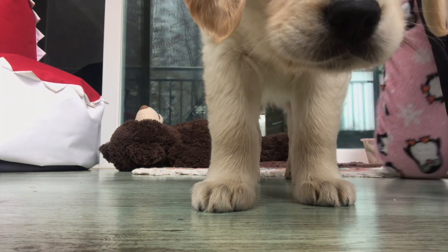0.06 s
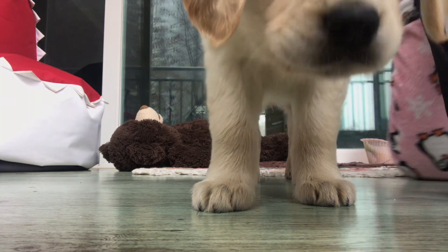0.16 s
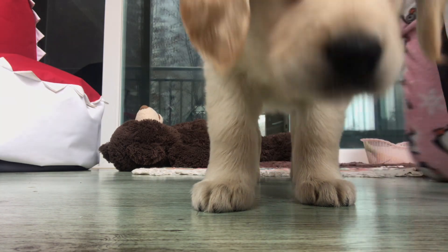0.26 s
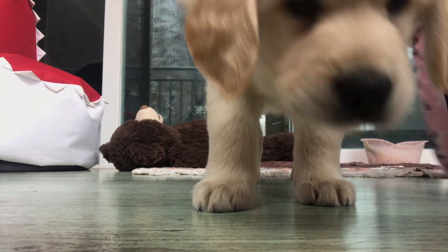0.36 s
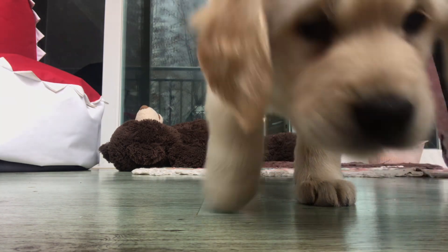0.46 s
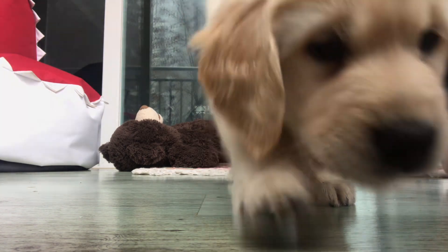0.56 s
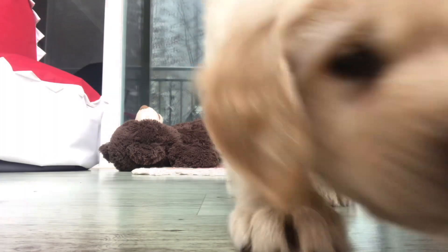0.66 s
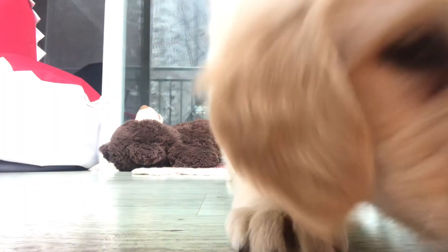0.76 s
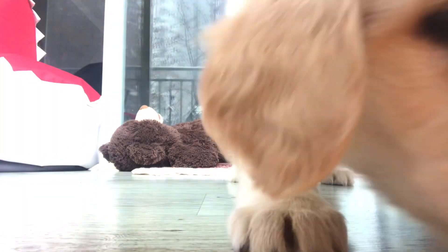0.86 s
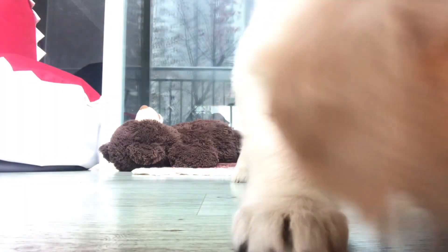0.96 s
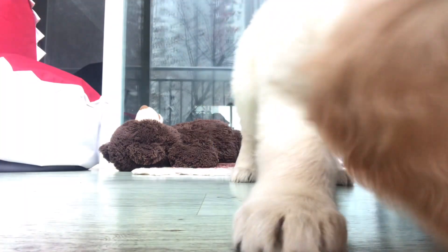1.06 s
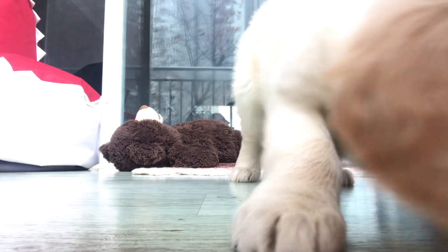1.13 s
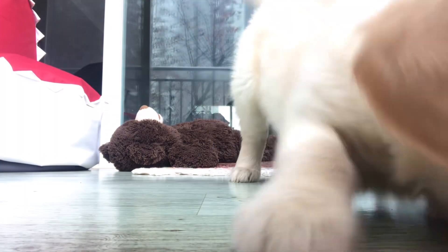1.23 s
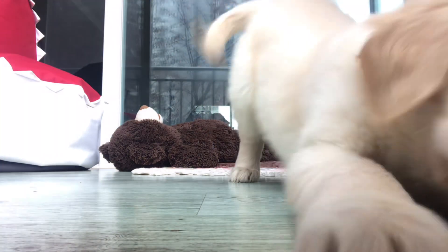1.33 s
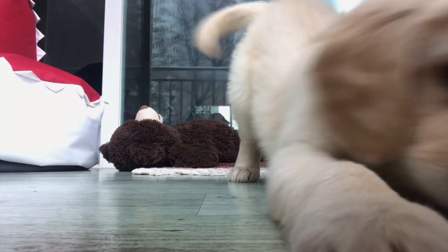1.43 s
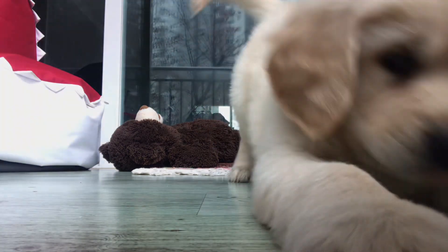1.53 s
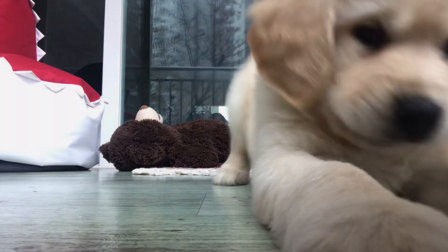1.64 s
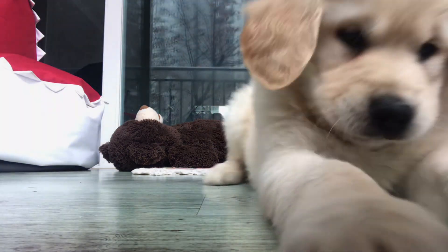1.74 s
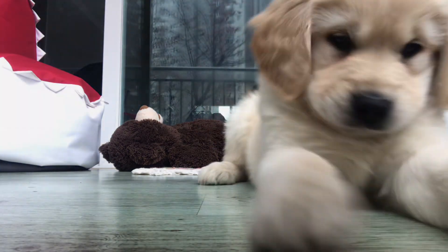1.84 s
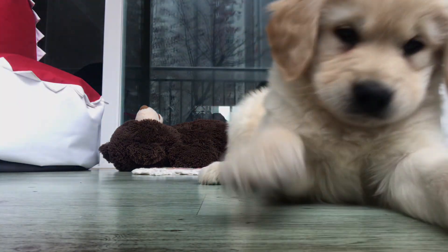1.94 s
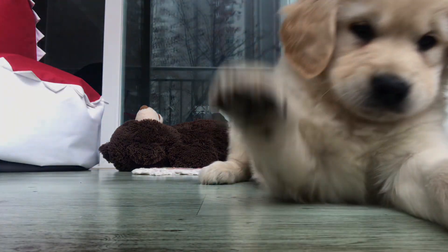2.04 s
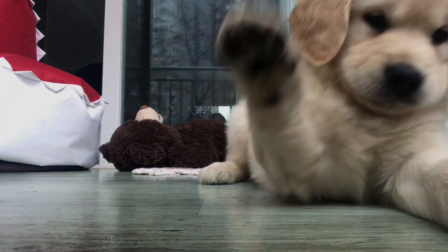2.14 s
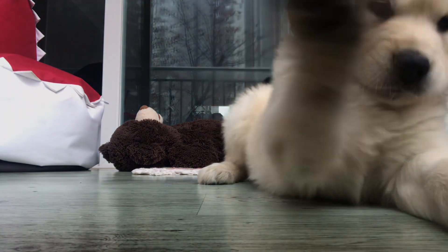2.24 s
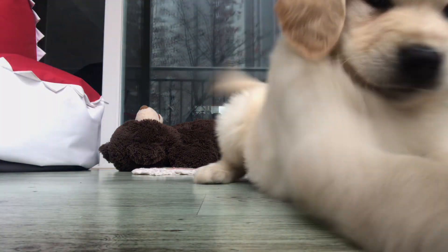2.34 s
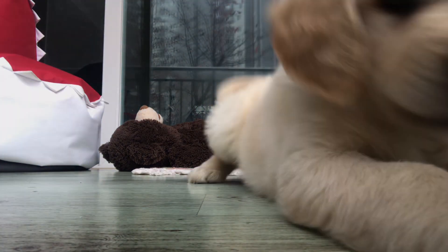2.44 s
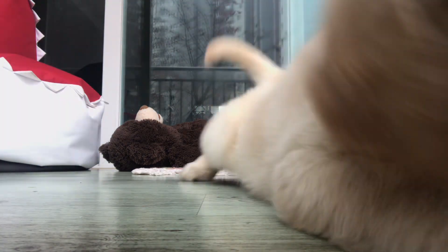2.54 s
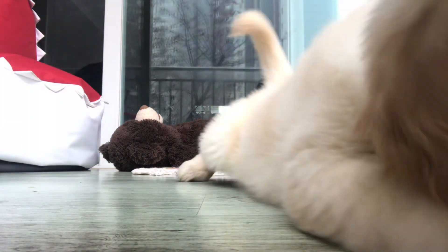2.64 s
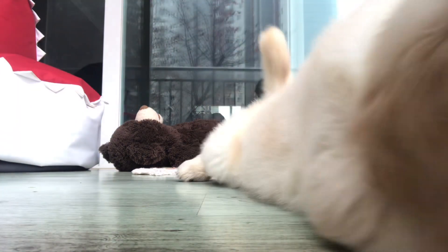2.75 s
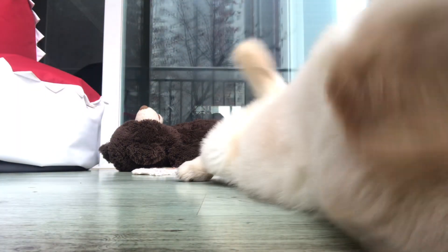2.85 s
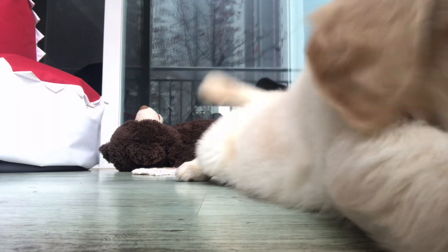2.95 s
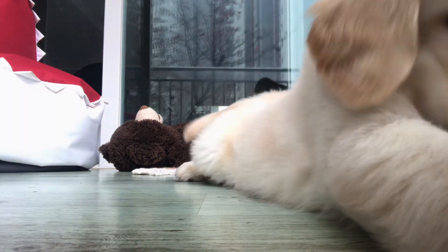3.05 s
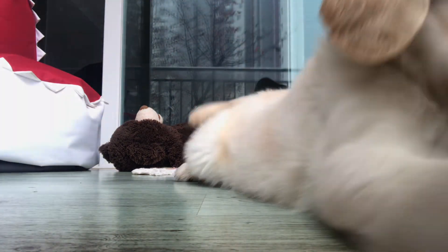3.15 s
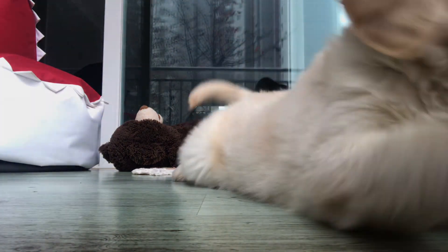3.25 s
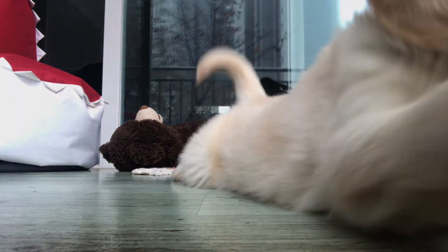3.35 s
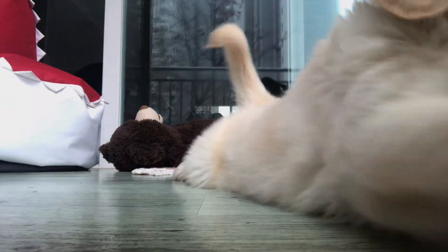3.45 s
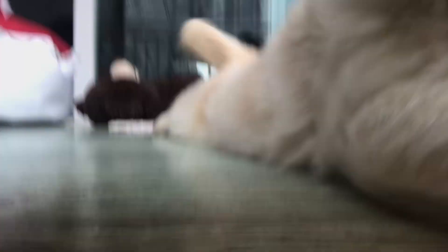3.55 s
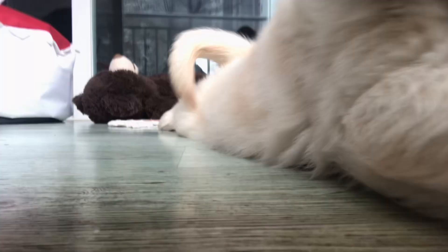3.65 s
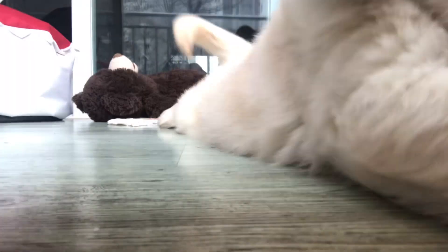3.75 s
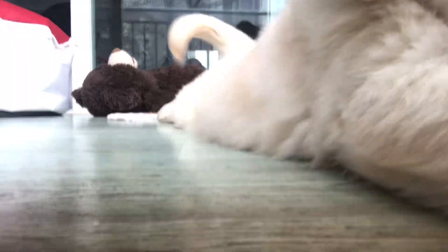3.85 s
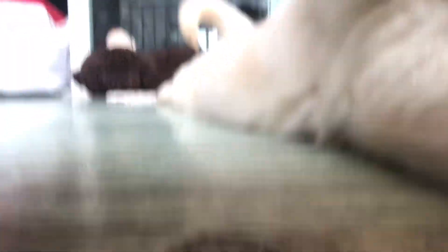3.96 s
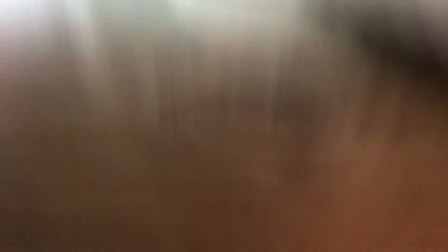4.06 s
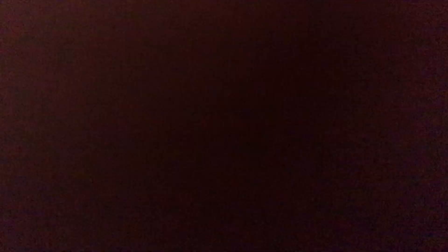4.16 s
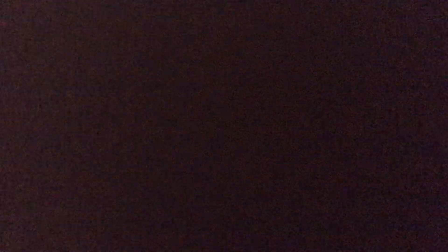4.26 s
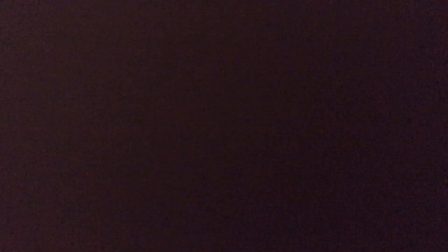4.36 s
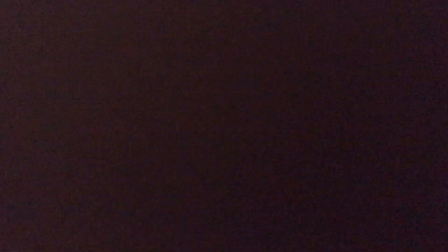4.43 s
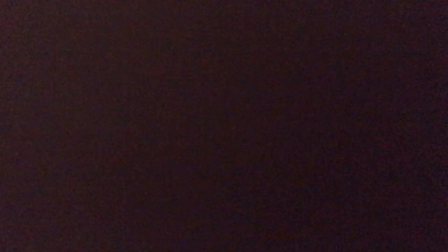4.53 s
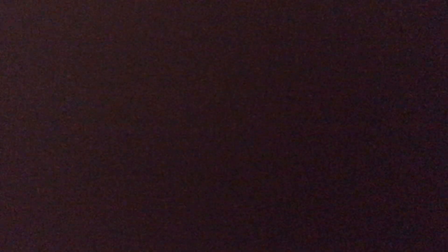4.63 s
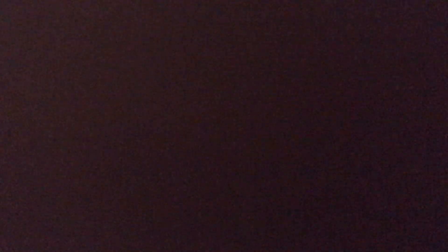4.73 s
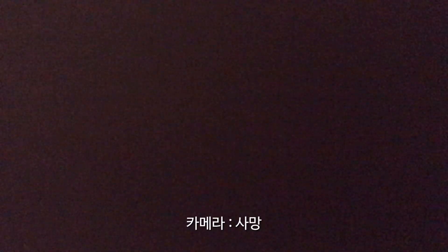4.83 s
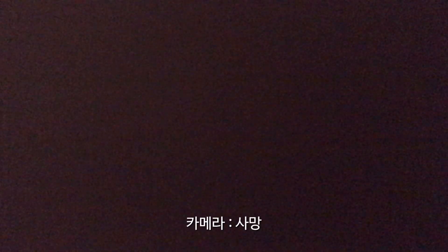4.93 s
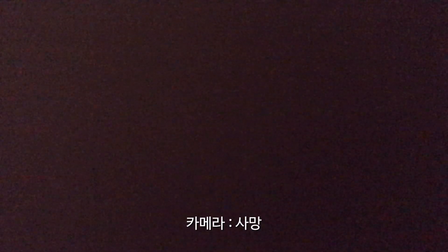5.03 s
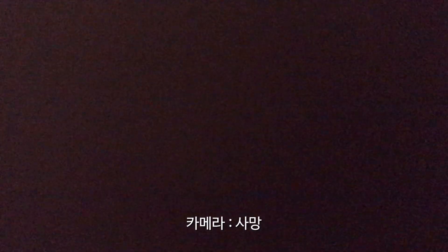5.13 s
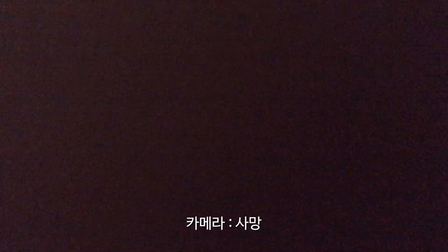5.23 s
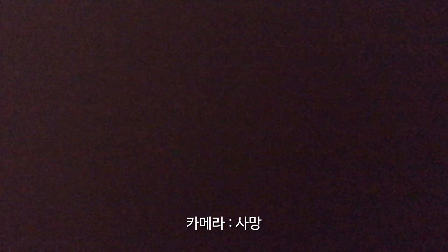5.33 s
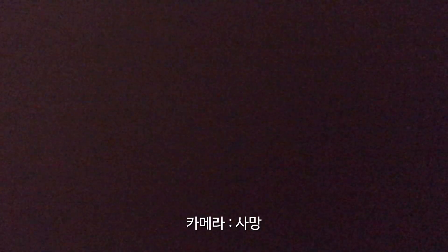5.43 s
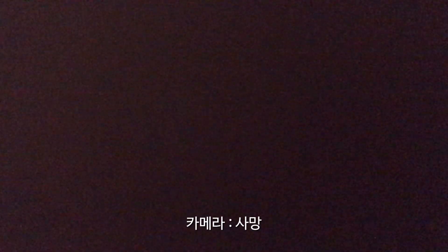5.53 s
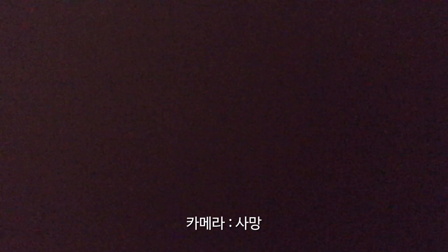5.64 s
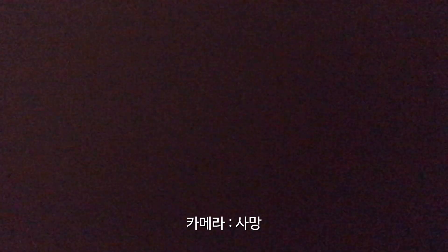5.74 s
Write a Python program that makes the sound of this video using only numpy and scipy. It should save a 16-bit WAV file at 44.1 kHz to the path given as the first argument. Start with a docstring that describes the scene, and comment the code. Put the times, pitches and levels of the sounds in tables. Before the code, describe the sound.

Soft claw ticks, snorts and fur rustle close by, then sharp plastic clacks as a phone topples, followed by dull scraping and thumps.

```python
"""Puppy topples a phone

A puppy sniffs at a phone that stands on a wooden floor, lies down and paws it until it topples.
Claws, fur and scuffs are shaped noise and sparse grains; the case clacks with cracks and decaying
modes, and thumps with sinking sines. Then the phone lies on its face: the room is dimmed, shoves
rub as a dull rush with gritty hiss, and a floorboard note joins in.
"""
import sys
import numpy as np
from scipy import signal
from scipy.fft import rfft, irfft
from scipy.io import wavfile
from scipy.ndimage import uniform_filter1d

SR = 44100
rng = np.random.default_rng(int(sys.argv[2]) if len(sys.argv) > 2 else 0)


def file_out(sig):
    """Save sig as 16-bit WAV at sys.argv[1]."""
    # one column per channel
    cols = np.atleast_2d(sig).T
    # limit, then scale
    lim = np.clip(cols, -1, 1)
    pcm = np.round(lim * 32767).astype(np.int16)
    wavfile.write(sys.argv[1], SR, pcm)


N = 255339
TIME = np.arange(N) / SR
FALL_S = 4.2  # from here the microphone is covered and the case is pressed to the floor
FLAT_S = 4.38  # from here the phone lies flat


def amp(db):
    """Decibels to gain."""
    return 10 ** (np.asarray(db) / 20)


def unit(x):
    """Scale to an energy of one."""
    return x / np.sqrt(np.sum(x ** 2))


def colour(x, points):
    """Filter x through a curve of (frequency [Hz], gain [dB]) points, then bring it to rms one."""
    hz, db = np.transpose(points)
    f = np.maximum(np.arange(N // 2 + 1) * SR / N, 1)
    curve = amp(np.interp(np.log(f), np.log(hz), db))
    y = irfft(rfft(x) * curve, N)
    return y / y.std()


def resonate(x, hz, q):
    """Two-pole band-pass."""
    w = 2 * np.pi * min(hz, SR / 3) / SR
    a = np.sin(w) / (2 * q)
    return signal.lfilter([a, 0, -a], [1 + a, -2 * np.cos(w), 1 - a], x)


def low_cut(x, hz):
    """Second-order high-pass."""
    return signal.sosfilt(signal.butter(2, hz, "high", fs=SR, output="sos"), x)


def fade(t, t60):
    """Exponential decay that falls by 60 dB in t60 seconds."""
    return np.exp(-np.log(1000) * t / t60)


def hann(seconds):
    """A smooth bump with a sum of one."""
    w = np.hanning(int(seconds * SR) + 3)
    return w / w.sum()


def stroke(start, end, edge):
    """A gate with rounded edges that take `edge` seconds to open and close."""
    gate = (TIME > start) * (TIME < end) * 1.
    return np.clip(signal.fftconvolve(gate, hann(edge), "same"), 0, 1)


def walk(rate):
    """A smooth random wander at rms one, with `rate` new values a second."""
    k = max(int(SR / rate), 1)
    steps = np.repeat(rng.standard_normal(N // k + 1), k)[:N]
    y = uniform_filter1d(steps, k)
    return y / y.std()


def friction(grain_db, grain_rate):
    """Countless tiny catches as noise whose strength wanders from moment to moment, at rms one."""
    y = rng.standard_normal(N) * amp(grain_db * walk(grain_rate))
    return y / y.std()


def grit(per_s, spread_db):
    """Sparse grains, most tiny and a few large, at rms one."""
    chance = rng.random(N)
    size = np.minimum(rng.exponential(size=N), 4)
    sign = rng.choice([-1, 1], N)
    y = (chance < per_s / SR) * sign * amp(spread_db * size)
    return y / y.std()


def add(out, s, x):
    """Mix x into out at time s."""
    i = int(s * SR)
    out[i:i + len(x)] += x[:N - i]


# colour of the indoor air: (frequency [Hz], relative gain [dB])
AIR_COLOUR = [(22, -37), (59, 1.5), (242, -7.5), (310, -3.5), (363, -9), (796, -15), (1100, -13.5),
              (2000, -25), (4140, -29), (16000, -37.5)]


def room_tone(air_db=-55, covered_db=-17, hum_hz=58, hum_db=-64):
    """Steady indoor air with a wavering low hum; weaker once the microphone faces the floor."""
    air = amp(air_db) * colour(rng.standard_normal(N), AIR_COLOUR)
    hum = resonate(rng.standard_normal(N), hum_hz, q=5.8)
    bed = air + amp(hum_db) * hum / hum.std()
    return bed * amp(covered_db * (TIME > FALL_S))


# colour of fur, also used for the hiss of the snorts: (frequency [Hz], relative gain [dB])
FUR_COLOUR = [(300, 4.5), (1200, 4.5), (6500, -1.5), (9000, -5.5), (13000, -4.5), (16000, -6)]
# clearest strokes of fur and pads: (start [s], end [s], level [dB], centre [Hz])
BRUSH_STROKES = [(0.143, 0.18, -59, 7000), (0.94, 1, -57, 6000), (1.294, 1.394, -53, 7350),
                 (1.625, 1.697, -55, 5760), (1.805, 1.847, -45.5, 3900), (3.139, 3.225, -52.5, 7760),
                 (3.521, 3.63, -56.5, 2600), (3.991, 4.045, -44, 2870), (4.16, 4.235, -53, 4580),
                 (4.264, 4.343, -53.5, 9000)]


def brushing(grit_db=-4, q=0.32, edge_s=0.039, low_cut_hz=1500):
    """Hairs and pads drag by with a fine grain and small ticks, each stroke in its own broad band."""
    grains = friction(grain_db=2.0, grain_rate=110) + amp(grit_db) * grit(per_s=420, spread_db=4.5)
    hairs = low_cut(colour(grains, FUR_COLOUR), low_cut_hz)
    out = np.zeros(N)
    for start, end, level_db, hz in BRUSH_STROKES:
        band = resonate(hairs, hz, q)
        swell = stroke(start, end, edge_s + 0.2 * (end - start))  # long strokes swell slowly
        out += amp(level_db) * band / band.std() * swell
    return out


# toes scuffing the boards: (time [s], energy of the board knock [dB], note [Hz])
TOE_SCUFFS = [(.632, -12.5, 1110), (1.038, -24, 1010), (2.417, -16.5, 1300), (2.731, -5.5, 920),
              (3.491, -16.5, 1100)]


def paw_taps(scuff_t60=0.066, q=2.0, rasp_db=-7, rasp_hz=4200, rasp_q=1.0, rasp_t60=0.13):
    """A toe lands with a dull, blurred knock of the board, and its pad rasps briefly over the grain."""
    out, t = np.zeros(N), TIME[:SR // 10]
    grains = friction(grain_db=4.5, grain_rate=560)
    for s, db, hz in TOE_SCUFFS:
        scuff = grains[int(s * SR):][:len(t)]
        board = unit(resonate(resonate(scuff * fade(t, scuff_t60), hz, q), hz, q))
        rasp = unit(resonate(scuff * fade(t, rasp_t60), rasp_hz, rasp_q))
        add(out, s, amp(db) * (board + amp(rasp_db) * rasp))
    return out


def room_echo(x, wet_db=-22, t60=0.36, centre_hz=2800):
    """The walls return a short, thin tail while the phone stands; its feed sinks as the phone goes over."""
    t = TIME[:SR // 2]
    reflections = rng.standard_normal(len(t)) * fade(t, t60) * (t > .004)
    tail = unit(resonate(reflections, centre_hz, q=0.047))
    feed = x * np.interp(TIME, [3.8, 4.15], [1, .15])
    return amp(wet_db) * signal.fftconvolve(feed, tail)[:N]


def crack(hz, q=0.79, chatter_db=-11, chatter_t60=0.016, bend_q=1.4):
    """One sharp contact with a little chatter behind it, at an energy near one."""
    t = TIME[:SR // 5]
    push = amp(chatter_db) * unit(rng.standard_normal(len(t)) * fade(t, chatter_t60))
    push[0] += 1
    y = resonate(push, hz, q)
    y = unit(y + 2.1 * resonate(y, hz, q))
    for bend_hz in (hz, hz / 2):  # bending waves bring the treble first and the mids late
        y = y - 2 * resonate(y, bend_hz, bend_q)
    return y


# modes of the case: (nominal frequency [Hz], relative level [dB], free decay t60 [s])
CASE_MODES = [(340, -3.5, 0.064), (650, -9, 0.034), (870, 7.5, 0.00095), (994, -0.5, 0.01),
              (1450, -12, 0.011), (1520, -35, 0.11), (2220, -17, .018), (2560, -32, 0.12),
              (3480, -37, 0.11)]


def case_ring(s, detune=0.04, pressed_t60=0.043):
    """The case's modes, slightly detuned at each strike; lying on the floor cuts the long ones short."""
    t = TIME[:SR // 5]
    longest = pressed_t60 if s > FALL_S else np.inf
    ring = np.zeros(len(t))
    for hz, db, t60 in CASE_MODES:
        mode_hz = hz * (1 + detune * rng.standard_normal())
        ring += amp(db) * np.sin(2 * np.pi * mode_hz * t) * fade(t, min(t60, longest))
    return unit(ring)


# claws on the boards and small ticks of the case: (time [s], energy of the crack [dB], centre [Hz])
LIGHT_TICKS = [(.650, -23, 4870), (.868, -13.5, 5900), (0.957, -25, 6000), (0.963, -19.5, 5300),
               (1.3546, -19, 6000), (1.6725, -22, 5830), (2.4102, -19, 5770), (2.585, -15, 3130),
               (2.736, -14.5, 2380), (3.0049, -26.5, 2440), (3.357, -31.5, 3970), (3.518, -9, 5060),
               (3.572, -15.5, 3500), (3.677, -27, 5470), (3.73, -21.5, 2700), (4.1687, -2, 1510),
               (4.2, -10.5, 5500), (4.85, -19, 3180), (5.1113, -4, 2980), (5.166, -17.5, 5030),
               (5.2485, -30.5, 2930), (5.366, -25.5, 1810)]


def ticks(case_db=-15, q=1.4):
    """Light contacts crack in a narrower band and barely ring the case."""
    out = np.zeros(N)
    for s, db, hz in LIGHT_TICKS:
        contact = unit(resonate(crack(hz), hz, q))
        add(out, s, amp(db) * (contact + amp(case_db) * case_ring(s)))
    return out


# nose resonances before each snort shifts them: (frequency [Hz], relative gain [dB])
NOSE_COLOUR = [(150, -21), (350, -18.5), (560, -0.5), (780, -14), (1080, -2.5), (1600, -9.5), (2250, -13.5),
               (3200, -17), (7000, -23), (15000, -32.5)]
# snorts: (start [s], end [s], first level [dB], last level [dB], softness of the edges [s],
# shift of the nose resonances [ratio], hiss level [dB], hiss centre [Hz])
SNORT_PUFFS = [(0.692, 0.809, -49, -38, 0.046, 0.95, -62, 5500),
               (1.135, 1.272, -40.5, -47.5, 0.074, 1.015, -51, 5500),
               (1.753, 1.833, -45, -47.5, 0.14, 0.93, -53, 4400),
               (2.683, 2.735, -33.5, -32, 0.11, 1.02, -39, 11500),
               (2.746, 2.797, -34, -34, 0.14, 0.84, -39.5, 2680)]


def snorts(hiss_q=1.0, wet_db=-8, release_edges=1.58):
    """Puffs of air swell and trail off through the nose's resonances, under a thin, wetly crackling hiss."""
    air, out = friction(grain_db=1.5, grain_rate=300), np.zeros(N)
    spray = friction(grain_db=2.5, grain_rate=350) + amp(wet_db) * grit(per_s=190, spread_db=1.0)
    jet = colour(spray, FUR_COLOUR)
    for start, end, first_db, last_db, edge, shift, hiss_db, hiss_hz in SNORT_PUFFS:
        nose = colour(air, [(hz * shift, gain_db) for hz, gain_db in NOSE_COLOUR])
        hiss = resonate(resonate(jet, hiss_hz, hiss_q), hiss_hz, hiss_q)
        flow = amp(np.interp(TIME, [start, end], [first_db, last_db]))
        release = fade(np.maximum(TIME - end, 0), release_edges * edge)  # softer edges trail off longer
        puff = stroke(start, np.inf, edge) * release
        out += (flow * nose + amp(hiss_db) * hiss / hiss.std()) * puff
    return out


# colour of a claw on the wood: (frequency [Hz], relative gain [dB])
SCRAPE_COLOUR = [(500, -32), (1500, -12), (2500, -5.5), (3800, -7.5), (4450, 2), (7000, 0.5), (9000, -10.5),
                 (16000, -18)]
# pressure of a skidding claw, around which the slips wander: (time [s], level [dB])
CLAW_PRESSURE = [(0.867, -32.5), (.879, -39.5), (.885, -29.5), (.903, -31)]


def claw_scrape(grit_db=1, ring_hz=3170, ring_db=13, tail_db=-16, tail_t60=0.1, skip_db=2.0):
    """A claw catches, eases and skids on in quick, uneven slips; a faint note lingers in the ragged tail."""
    when, press_db = np.transpose(CLAW_PRESSURE)
    start, end = when[0], when[-1]
    tail = amp(tail_db) * (TIME > end) * fade(np.maximum(TIME - end, 0), tail_t60)
    contact = stroke(start, end, 0.0033) + tail
    pressure = contact * amp(np.interp(TIME, when, press_db) + skip_db * walk(260))
    grains = friction(grain_db=-0.5, grain_rate=700) + amp(grit_db) * grit(per_s=700, spread_db=1.5)
    slips = colour(grains, SCRAPE_COLOUR) * pressure
    return slips + amp(ring_db) * resonate(slips, ring_hz, q=140)


# soft blows of the phone's body on the boards: (time [s], level before build-up and decay [dB],
# first pitch [Hz], last pitch [Hz], decay t60 before the choke [s])
BODY_BLOWS = [(0.962, -36, 197, 137, 0.034), (2.389, -27.5, 151, 91, 0.051), (3.5262, -12, 290, 264, 0.035),
              (3.558, -1, 270, 238, 0.021), (4.171, -2.5, 159.6, 110, 0.029), (4.1801, -5.5, 60, 60, 0.16),
              (4.183, 0, 165, 140, 0.028), (4.2305, -19, 75, 60, 0.06), (4.333, -21, 71.6, 62, 0.12),
              (4.958, -6.5, 166, 107, 0.061), (4.998, -19, 120, 94.5, 0.1), (5.024, -2.5, 226, 141, 0.023),
              (5.052, -5, 296, 72, 0.044), (5.1073, -2, 257, 199, 0.017), (5.1487, -1.5, 157, 68, 0.059),
              (5.183, 9.5, 169, 147, 0.0062), (5.193, -1.5, 61.7, 58, 0.062),
              (5.356, -32.5, 100, 85.3, 0.23), (5.431, -26.5, 89, 70, 0.088),
              (5.503, -5.5, 92, 59.4, 0.098)]


def thumps(rise_cycles=0.2, choke=0.73, settle_s=0.0041):
    """A soft push builds over part of a cycle and swings out, settling in pitch until friction chokes it."""
    out, t = np.zeros(N), TIME[:SR // 4]
    for s, db, first_hz, last_hz, t60 in BODY_BLOWS:
        decay = fade(t, t60) * np.exp(-(choke * t / t60) ** 4)
        cycles = np.cumsum(last_hz + (first_hz - last_hz) * np.exp(-t / settle_s)) / SR
        build_up = 1 - np.exp(-cycles / rise_cycles)
        add(out, s, amp(db) * np.sin(2 * np.pi * cycles) * decay * build_up)
    return out


# colour of the coat on the floor: (frequency [Hz], relative gain [dB])
COAT_COLOUR = [(500, -7), (1100, 2.5), (1800, -5.5), (2150, -1.5), (3200, -9.5), (4000, -1.5), (6800, -2),
               (9500, -10), (16000, -16.5)]
# the puppy lies down and shifts: (start [s], end [s], level around which the rustle wavers [dB])
COAT_SHIFTS = [(1.265, 1.717, -59), (1.82, 1.96, -55), (2.027, 2.177, -57.5), (2.28, 2.43, -60),
               (2.473, 2.7, -53), (3.23, 4.017, -63.5)]


def coat_rustle(grit_db=-2, waver_db=2.0, waver_rate=35, edge_s=0.15):
    """A soft, fluttering rustle of the coat on the floor, with a fine crackle of hairs."""
    grains = friction(grain_db=2.0, grain_rate=120) + amp(grit_db) * grit(per_s=520, spread_db=4.5)
    motion = sum(amp(db) * stroke(start, end, edge_s) for start, end, db in COAT_SHIFTS)
    return colour(grains, COAT_COLOUR) * motion * amp(waver_db * walk(waver_rate))


# a pad squeaks on the varnish: (start [s], end [s], peak level [dB], first pitch [Hz], last pitch [Hz])
PAD_SQUEAK = (1.424, 1.439, -45, 1720, 2040)


def squeak():
    """A pad sticks and slips so fast that it gives a tiny rising note."""
    start, end, db, first_hz, last_hz = PAD_SQUEAK
    cycles = np.cumsum(np.interp(TIME, [start, end], [first_hz, last_hz])) / SR
    swell = np.sin(np.interp(TIME, [start, end], [0, np.pi])) ** 2
    return amp(db) * np.sin(2 * np.pi * cycles) * swell


# knocks of the case, levels before the trims in knocks(): (time [s], delay of the flat landing [s],
# crack energy [dB], crack centre of the flat landing [Hz], case energy [dB], hollow note at first [Hz])
CASE_KNOCKS = [(2.3826, 0.0041, -4.5, 3870, -18, 650), (3.113, 0.0011, -34, 2200, -24.5, 596),
               (3.506, 0.0025, 6.5, 4280, -4.5, 1120), (3.557, 0.0036, 8, 2550, 9, 1543),
               (4.15, .0004, -3.5, 6030, -2, 1010), (4.1624, 0.00087, -6.5, 1510, 2.5, 310),
               (4.184, 0.00151, 5, 2050, 13, 818), (4.2181, 0.0038, -13, 5600, -3.5, 286),
               (4.329, 0.0011, -20.5, 4340, -1, 870), (4.348, 0.00096, -26, 1600, -5, 693),
               (5.0235, 0.0015, -21, 1390, -5, 1000), (5.048, 0.0017, 5.5, 3560, 7, 1500),
               (5.071, 0.0015, -14, 2780, -1, 900), (5.1054, 0.00056, 3, 2830, 7, 1250),
               (5.1506, 0.0018, -11, 2530, -4, 960), (5.183, 0.0012, -19.5, 4440, -5, 900),
               (5.3083, 0.00093, -36, 2610, -22.5, 900), (5.4174, 0.00055, -35, 2500, -18.5, 720)]


def knocks(edge_db=-1, edge_brighter=1.03, edge_ring_db=-7, flat_db=-1, flat_ring_db=-3,
           note_db=-2, note_t60=0.017, octave_s=0.003):
    """The case lands on an edge, then flat with a fuller ring; the spot struck adds a hollow note."""
    out, t = np.zeros(N), TIME[:SR // 5]
    for s, flat_after, crack_db, hz, case_db, note_hz in CASE_KNOCKS:
        ring = amp(case_db) * case_ring(s)
        # lying flat, the phone picks up the boards' bending waves, slower the lower: the note dives
        cycles = np.cumsum(note_hz / (1 + (s > FLAT_S) * t / octave_s)) / SR
        note = amp(case_db + note_db) * unit(np.sin(2 * np.pi * cycles) * fade(t, note_t60))
        edge_crack = amp(crack_db + edge_db) * crack(hz * edge_brighter)
        flat_crack = amp(crack_db + flat_db) * crack(hz)
        add(out, s, edge_crack + amp(edge_ring_db) * ring + note)
        add(out, s + flat_after, flat_crack + amp(flat_ring_db) * ring)
    return out


# the edge of the case juddering over the boards: (start [s], end [s], level [dB], centre [Hz])
EDGE_JUDDERS = [(3.513, 3.54, -36, 1050), (4.15, 4.181, -32, 890), (4.184, 4.232, -50.5, 5000)]


def judders(q=0.69):
    """A hard edge skips over the boards in a dense run of small, uneven knocks."""
    skips, out = grit(per_s=1300, spread_db=3.5), np.zeros(N)
    for start, end, db, hz in EDGE_JUDDERS:
        band = resonate(resonate(skips, hz, q), hz, q)
        out += amp(db) * band / band.std() * stroke(start, end, 0.0033)
    return out


# colours of the dull rush and of the gritty hiss: (frequency [Hz], relative gain [dB])
RUSH_COLOUR = [(40, 11), (130, 12.5), (380, 4), (620, 6), (1100, -3.5), (1750, -11.5), (2600, -21.5),
               (8000, -51.5)]
HISS_COLOUR = [(600, -15.5), (1800, 5), (2600, 3), (4000, 3.5), (5200, -8), (7200, -8), (9200, -6.5),
               (12000, -15), (16000, -27.5)]
# shoves of the phone over the boards: (start [s], end [s], rush level midway [dB],
# hiss level midway [dB], swell of the rush from start to end [dB], release t60 [s])
PHONE_SHOVES = [(4.112, 4.185, -36.5, -43, 2.5, 0.057), (4.283, 4.335, -37.5, -59, 17, 0.0088),
                (4.403, 4.716, -48.5, -72.5, 17.5, 0.13), (4.798, 4.955, -34, -50, 3, 0.082),
                (5.008, 5.183, -32, -44, 1.5, 0.025), (5.35, 5.372, -47.5, -56, -2, 0.18),
                (5.445, 5.509, -53, -64, 4, 0.51), (5.627, 5.758, -52, -59.5, -7, 0.44)]


def sliding(grit_db=-5, creep_db=-59, skip_db=-9.5, skip_hz=970, skip_q=1.8, hiss_growth=1.32, attack_s=0.1):
    """The phone rubs on the boards: a rush with tiny skips, its hiss growing faster with speed."""
    body = colour(friction(grain_db=2.0, grain_rate=320), RUSH_COLOUR)
    skips = resonate(resonate(grit(per_s=700, spread_db=3.5), skip_hz, skip_q), skip_hz, skip_q)
    body = body + amp(skip_db) * skips / skips.std()
    catches = friction(grain_db=2.5, grain_rate=160) + amp(grit_db) * grit(per_s=500, spread_db=4)
    hiss = colour(catches, HISS_COLOUR)
    out = amp(creep_db) * body * stroke(FLAT_S, 5.25, attack_s)  # a faint creep beneath the shoves
    for start, end, rush_db, hiss_db, swell_db, release in PHONE_SHOVES:
        push = stroke(start, np.inf, attack_s) * fade(np.maximum(TIME - end, 0), release)
        speed = amp(swell_db * np.interp(TIME, [start, end], [-.5, .5]))
        rush = amp(rush_db) * speed * body
        out += push * (rush + amp(hiss_db) * speed ** hiss_growth * hiss)
    return out


def floorboard(x, hz=631, db=2, q=26):
    """Once the phone lies flat, whatever strikes or rubs it also sounds the note of the board beneath."""
    return x + amp(db) * resonate(x * (TIME > FLAT_S), hz, q)


def scene():
    """Everything happens within a paw's reach of the microphone."""
    near = paw_taps() + ticks() + snorts() + claw_scrape() + thumps() + squeak() + knocks() + judders()
    on_boards = floorboard(near + sliding())
    return (room_tone() + brushing() + on_boards + room_echo(near) + coat_rustle())[None]


def record(dry, dip_hz=10700, dip=0.45, low_cut_hz=24, top_hz=16000):
    """The microphone drops the deepest bass and dulls one treble band; hard knocks round off; the top is cut."""
    heard = low_cut(dry - dip * resonate(dry, dip_hz, q=14), low_cut_hz)
    heard = heard / (1 + heard ** 8) ** (1 / 8)  # rounds peaks off below full scale
    return signal.sosfilt(signal.ellip(10, .2, 70, top_hz, fs=SR, output="sos"), heard)


dry = scene()
out = record(dry)
file_out(out)
```